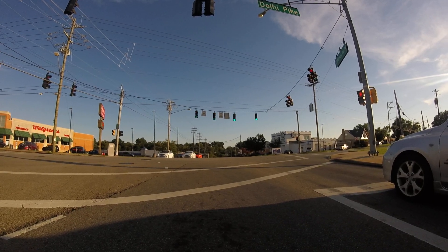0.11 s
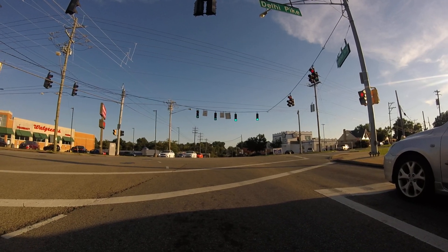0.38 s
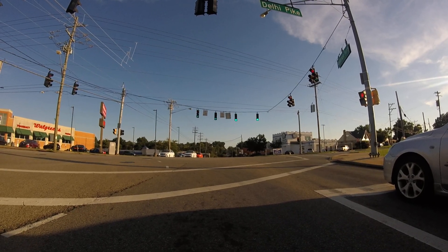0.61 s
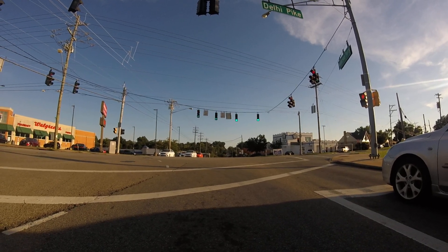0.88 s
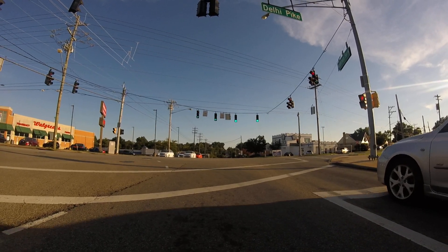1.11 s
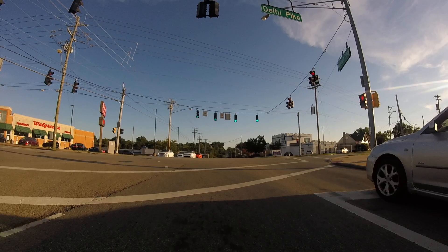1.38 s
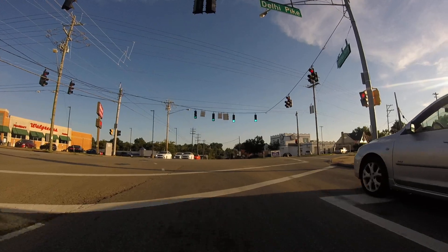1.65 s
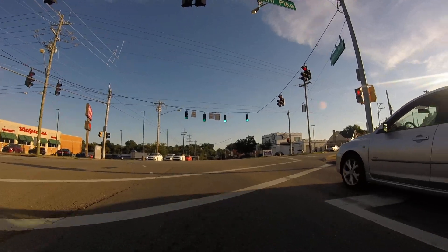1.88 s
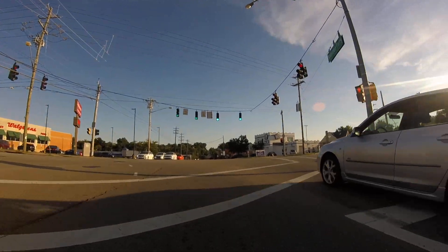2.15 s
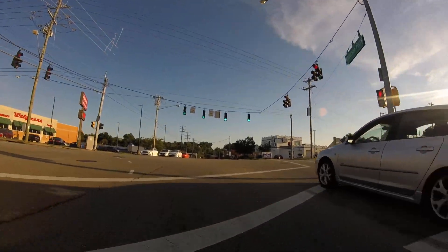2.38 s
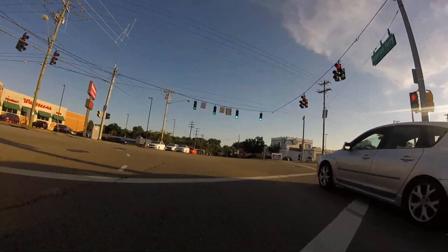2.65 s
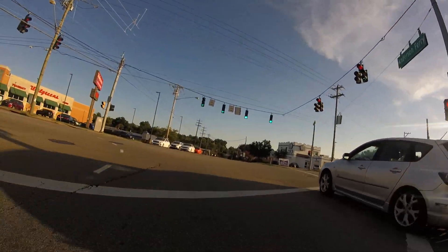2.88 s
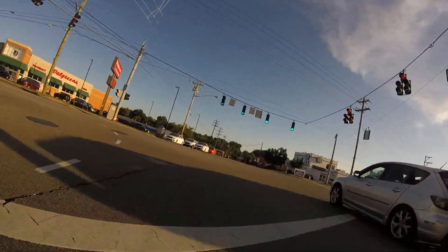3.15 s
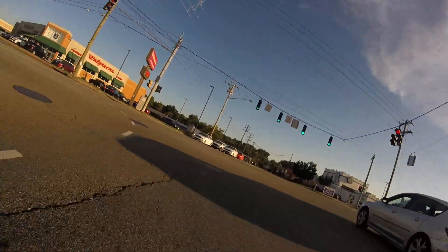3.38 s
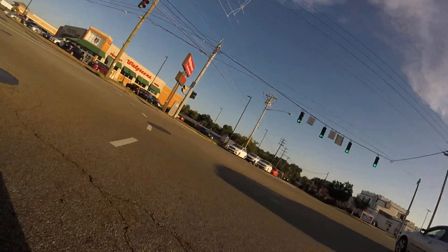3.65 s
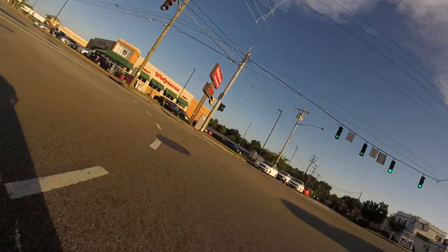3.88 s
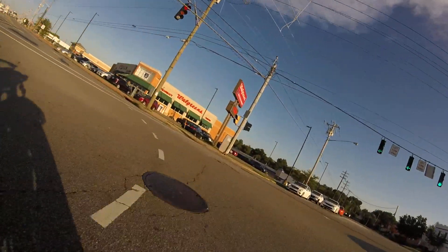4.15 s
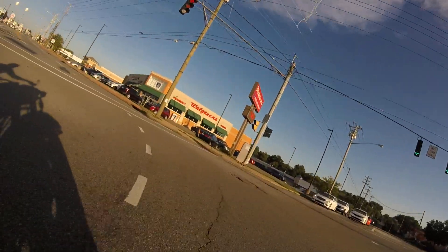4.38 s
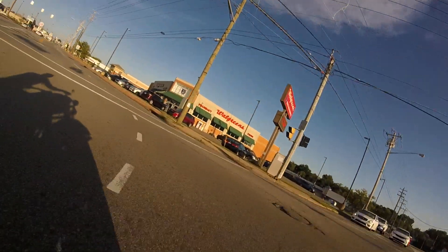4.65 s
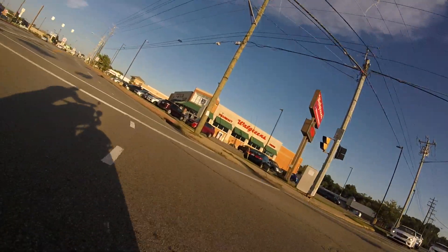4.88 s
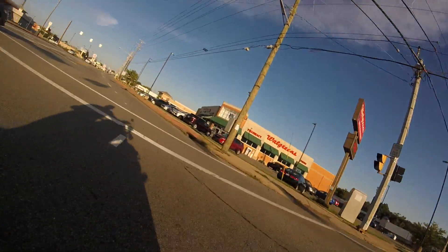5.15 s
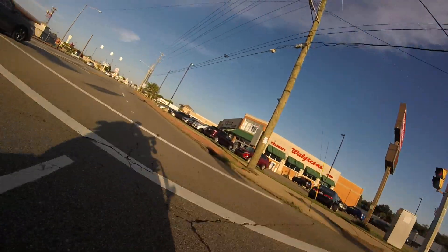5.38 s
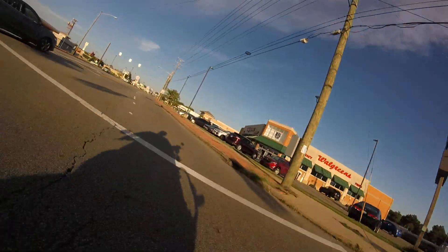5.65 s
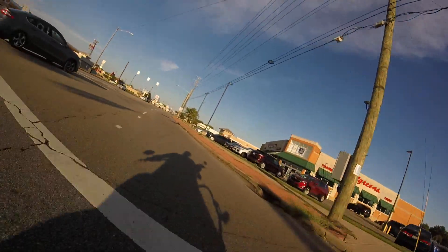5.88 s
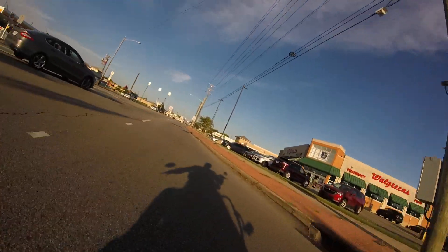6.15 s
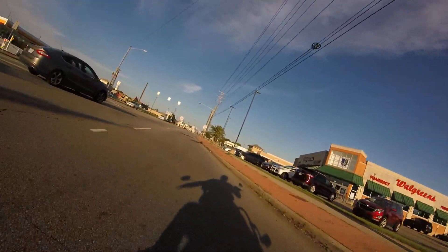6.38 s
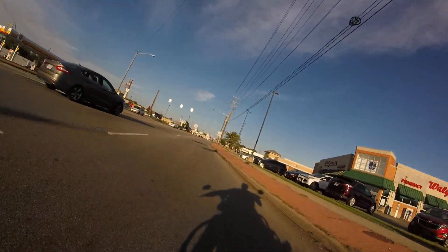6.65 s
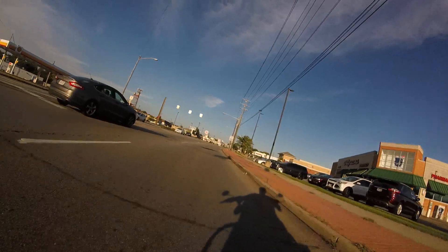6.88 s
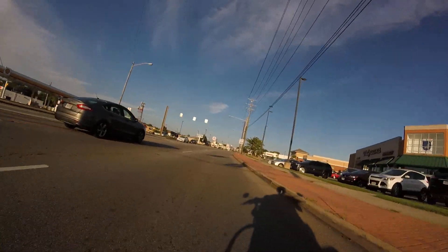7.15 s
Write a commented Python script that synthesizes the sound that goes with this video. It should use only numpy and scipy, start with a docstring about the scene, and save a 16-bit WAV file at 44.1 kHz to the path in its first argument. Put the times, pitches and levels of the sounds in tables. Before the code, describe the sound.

Muffled onboard motorcycle sound: quiet lumpy idle, sudden knock and pull-away, throbbing engine with case rattle and road-bump thuds, finally accelerating hard.

```python
"""A two-cylinder motorcycle idles, pulls away and rides on, heard by a camera in a closed case on the bike.
The crank shakes the frame; each firing thumps through it, rings the camera mount and stirs a rumble.
The camera rattles in its case in step with the crank, with loud single knocks on top; valve gear hisses and ticks.
Road bumps thud and briefly lift the hiss, rattle, rumble, pulses and shake, which then dip and creep back.
A low hum wavers at a standstill. Crank angles time the clicks that drive noise and resonances."""
import sys
import numpy as np
from scipy import signal
from scipy.io import wavfile
from scipy.ndimage import uniform_filter1d

SR = 44100
rng = np.random.default_rng(int(sys.argv[2]) if len(sys.argv) > 2 else 0)


def dump_mix(stems):
    """Bounce the given channels to the path in sys.argv[1] as a 16-bit WAV at rate SR."""
    frames = np.atleast_2d(stems).T  # one column per channel
    limited = np.clip(frames, -1, 1)  # hard clip at full scale
    pcm = np.round(limited * 32767).astype(np.int16)
    wavfile.write(sys.argv[1], SR, pcm)


def boost(x):
    """Linear amplitude factor 10**(x/20) for a level x in decibels (scalar or array-like)."""
    u = np.asarray(x, float) / 20
    return 10 ** u


N = 320607


def evened(x, span=1.0):
    """Brings the running rms over span seconds to 1."""
    power = np.abs(uniform_filter1d(x ** 2, int(span * SR)))
    return x / np.sqrt(power + 1e-14)


def curves(rows):
    """Every column of a table after its times, interpolated sample by sample."""
    s, *columns = np.transpose(rows)
    return [np.interp(np.arange(N) / SR, s, c) for c in columns]


def colour(x, points):
    """Causal filter with the given gain curve (f/Hz, level/dB)."""
    hz, db = np.transpose(points)
    size = 2 ** 14
    bins = abs(np.fft.fftfreq(size, 1 / SR))
    log_gain = np.interp(np.log(bins + 1), np.log(hz + 1), db) * np.log(10) / 20
    # the Hilbert transform of the log gain supplies the phase that makes it causal
    response = np.exp(np.conj(signal.hilbert(log_gain)))
    taps = np.fft.ifft(response).real[:size // 2]
    return signal.oaconvolve(x, taps)[:N]


def ring(x, hz, width):
    """A damped resonance, about gain 1 at its peak."""
    r = np.exp(-np.pi * width / SR)
    pole = r * np.exp(2j * np.pi * hz / SR)
    return 2 * signal.lfilter([1 - r], [1, -pole], x).real


def modes(x, table):
    """A bank of resonances; neighbouring modes answer in opposite phase."""
    return sum((-1) ** k * boost(db) * ring(x, hz, width) for k, (hz, width, db) in enumerate(table))


def fade(x, ms):
    """Turns clicks into envelopes that die away with time constant ms."""
    return signal.lfilter([1], [1, -np.exp(-1000 / (ms * SR))], x)


def beats(turns, angles, spread_db, jitter):
    """One click at each crank angle of each two-turn cycle, uneven in size (dB) and place (turns)."""
    at, db = np.transpose(angles)
    cycles = np.arange(0, turns[-1], 2)[:, None]
    chance = rng.standard_normal((len(cycles), len(at), 2))
    place = np.searchsorted(turns, cycles + at + jitter * chance[..., 0])
    size = boost(db + spread_db * chance[..., 1])
    return np.bincount(place.ravel(), size.ravel(), N + 1)[:N]


def loaded(speed, span):
    """Blend from idle (0) to riding (1) over span crank turns/s above 14."""
    return np.clip((speed - 14) / span, 0, 1)


# faint microphone noise [f/Hz, level/dB as filter gain]
HISS_FLOOR = [(3000, -78), (9000, -77), (12500, -79), (14000, -88), (16000, -105)]


def mic_hiss():
    """The microphone's own noise: white noise, nearly flat, rolled off in the highest treble."""
    return colour(rng.standard_normal(N), HISS_FLOOR)


# low hum that sinks and wavers, and the mount ring's idle swells
# [t/s, hum f/Hz, hum level/dB, mount ring level/dB]
IDLE_HUM = [(0.0, 43.55, -20, -45), (0.176, 43.56, -20.5, -28.5), (0.22, 43.24, -41, -43),
            (0.346, 44.7, -19, -31), (0.55, 42.46, -23, -35.5), (0.78, 39.5, -15.5, -23),
            (0.92, 41.5, -16.5, -35), (1.06, 40, -26.5, -30), (1.19, 38.5, -10, -24), (1.3, 40.6, -16, -32)]


def hum(speed):
    """A near-pure low tone, gone once the engine revs."""
    hz, db, _ = curves(IDLE_HUM)
    standstill = np.clip((27 - speed) / 8, 0, 1)
    return standstill * boost(db) * np.sin(2 * np.pi * np.cumsum(hz) / SR)


# road bumps under the wheels [t/s, thud drive level/dB, thud f/Hz, dip after it level/dB]
ROAD_BUMPS = [(1.342, -16, 71.3, 4.5), (2.348, -20, 75, 1.5), (3.279, -8.5, 93.8, 3),
              (4.024, -6.5, 75, 6.5), (4.627, -8.5, 75.7, 3.5), (4.68, -7, 79.6, 8), (4.774, -5, 71.2, 9),
              (4.859, -28, 75, 10), (5.076, -12.5, 73, 8.5), (5.778, -7, 81.3, 11.5), (6.235, -10, 77, 7)]


def bumps():
    """The suspension thuds for a few cycles: a sine with a quick onset and a short decay."""
    out, t = np.zeros(N), np.arange(SR // 5) / SR
    for s, db, hz, _ in ROAD_BUMPS:
        envelope = np.exp(-t / 0.042) * (1 - np.exp(-t / 0.0011))
        out[round(s * SR):][:len(t)] += boost(db) * np.sin(2 * np.pi * hz * t) * envelope
    return out


def jolts():
    """How strongly a bump jolts the hiss, rattle and engine layers (0-1), and the dip that follows (dB)."""
    lead_s, jolt_s, recover_db_per_s = 0.018, 0.065, 15
    s, db, _, dip_db = np.transpose(ROAD_BUMPS)[..., None]
    # one value per 64 samples, counted from just before the thud
    since = np.arange(0, N + 64, 64) / SR - s + lead_s
    strength = np.clip((db + 27) / 15, 0, 1)  # full from -12 dB up, none below -27 dB
    jolt = (((since > 0) & (since < jolt_s)) * strength).max(axis=0)
    remaining_db = np.maximum(dip_db - recover_db_per_s * (since - jolt_s), 0)
    dip = ((since >= jolt_s) * remaining_db).max(axis=0)
    return [uniform_filter1d(np.repeat(v, 64)[:N], size=600) for v in (jolt, dip)]


# how hard each firing pulls while riding, before each layer's share [t/s, level/dB]
PULL = [(1.2, -13.5), (1.45, -3), (1.75, 2.5), (2.2, 2.5), (3.0, -1), (3.5, -4.5), (3.75, -2),
        (3.95, -11.5), (4.45, -10.5), (5.0, 4), (5.7, -6), (6.2, 5.5), (6.7, -7.5), (7.27, -15.5)]
CRUISE, FAST = 36, 39.6  # crank turns/s: where riding levels hold, and where the fast slope begins


def level(speed, law):
    """A layer's gain from speed, throttle and bumps.

    slope: dB per doubling of speed; fast: dB per 12 turns/s above FAST; pull, dip: shares of throttle and dip.
    """
    idle_db, ride_db, slope_db, fast_db, pull, jolt_db, dips = law
    jolt, dip_db = jolts()
    ride_db = ride_db + slope_db * np.log2(speed / CRUISE)
    ride_db += fast_db * np.maximum(speed - FAST, 0) / 12
    ride_db += pull * curves(PULL)[0] + jolt_db * jolt - dips * dip_db
    return boost(idle_db + loaded(speed, 8) * (ride_db - idle_db))


# valve openings in a two-turn cycle [crank angle/turns, relative level/dB]
VALVE_ANGLES = [(.38, -5), (.95, -1.5), (1.51, -2.5), (1.84, 0.1)]
# treble colour of valve hiss and knock cracks [f/Hz, relative level/dB]
TREBLE_COLOUR = [(3000, -6), (3900, -3), (4300, -8.5), (4800, -13), (5700, -9.5), (6350, -9.5),
                 (6900, -16.5), (7400, -16.5), (8500, -20), (9600, -21), (10600, -27), (12000, -32),
                 (13200, -35), (14600, -45.5), (16000, -52)]
# hiss level law [idle/dB, ride/dB, slope/dB, fast/dB, pull, jolt/dB, dip]
HISS_LEVEL = (-63, -53.3, -4, 12.5, .1, 7, 1.35)


def valve_hiss(speed, turns):
    """Hiss that puffs as valves open, with one longer puff a cycle at idle."""
    idle = np.clip((20 - speed) / 6, 0, 1)
    openings = beats(turns, VALVE_ANGLES, spread_db=2.5, jitter=.03)
    puffs = (1 - idle) * fade(fade(openings, ms=.8), ms=3) / 36
    long_puffs = beats(turns, [(.93, 0.0097)], spread_db=5.0, jitter=0.0088)
    puffs += idle * 0.95 * fade(long_puffs, ms=6.5)
    hiss = colour(rng.standard_normal(N) * (.38 + puffs), TREBLE_COLOUR)
    return level(speed, HISS_LEVEL) * evened(hiss, span=.3)


# bright metal resonances, passed through twice [f/Hz, width/Hz, relative level/dB per pass]
TICK_MODES = [(7910, 400, 0), (9100, 380, 2), (10500, 400, -4), (12000, 340, -2.5)]
# how the tick comes and goes [t/s, level/dB before dips and resonance]
TICK_LEVEL = [(0, -80), (3.55, -60), (3.8, -50), (4.2, -44), (5.75, -44), (5.9, -58), (7.27, -62)]


def valve_tick(turns):
    """Valve gear ticks once a cycle: a click and a noise burst ring bright modes."""
    ticks = beats(turns, [(1.4, 0)], spread_db=1.5, jitter=.01)
    contact = 8 * ticks + rng.standard_normal(N) * fade(ticks, ms=1.5)
    tick = modes(modes(contact, TICK_MODES), TICK_MODES)
    return boost(curves(TICK_LEVEL)[0] - 0.29 * jolts()[1]) * tick


def strike(hits, noise):
    """A firm first contact and a short scrape."""
    return uniform_filter1d(8 * hits, size=5) + .75 * noise * fade(hits, ms=1.8)


# what the camera case rings with [f/Hz, width/Hz, relative level/dB]
CASE_MODES = [(764, 58, -7.5), (1071, 85.5, 3.5), (1332, 134, 2), (2050, 127, -3.5), (2485, 161, -2),
              (3200, 460, -17.5), (3690, 59, -19.5), (4540, 250, -32)]


def case(drive):
    """The case rings, and its walls dull the treble."""
    return signal.lfilter(*signal.butter(2, 4600, fs=SR), modes(drive, CASE_MODES))


# loud single knocks of the camera in its case
# [t/s, relative level/dB, treble against that level/dB]
SINGLE_KNOCKS = [(0.176, -26, -38), (0.2533, -17, -52), (0.3296, -22, -44), (0.4844, -26, -40),
                 (0.6489, -30, -36), (1.2136, -19, -34), (1.2444, -5, -31), (1.2501, 2, -38),
                 (1.3473, -6, -31), (1.3738, -12, -35), (1.3844, -10, -35), (1.4167, -10, -36),
                 (1.948, -12, -41), (2.1011, -13, -36), (2.2892, -14, -40), (2.3565, -10, -32),
                 (2.4608, -13, -38), (2.5351, -14, -37), (2.6823, -14, -41), (2.9741, -11, -43),
                 (3.2151, -8, -44), (3.2869, -12, -44), (3.5428, -10, -38), (3.7354, -9, -42),
                 (3.7953, -8, -47), (4.0377, -9, -35), (4.2542, -10, -44), (4.2837, -7, -54),
                 (4.5845, -10, -40), (4.6349, -7, -30), (4.6414, -9, -28), (4.6997, -9, -27),
                 (4.7721, -13, -33), (4.8873, -15, -33), (5.0769, -16, -36), (5.3477, -13, -44),
                 (5.5393, -11, -43), (5.7823, -10, -25), (5.8202, -14, -32), (6.2133, -12, -31),
                 (6.2572, -14, -28), (7.015, -6, -35)]


def knocks():
    """Each knock rings the case, with a crack on top; in the first second the camera also settles loosely."""
    s, db, treble_db = np.transpose(SINGLE_KNOCKS)
    at = (s * SR).astype(int)
    body = np.bincount(at, boost(db), N)
    crack = np.bincount(at, boost(db + treble_db), N)
    noise = rng.standard_normal((3, N))
    early = np.arange(N) < SR
    settle = noise[2] * fade(body * early, ms=28)
    loose = case(settle)
    loose += boost(15.5) * ring(ring(settle, 296, 120), 290, 250)
    loose += boost(3) * ring(ring(settle, 775, 80), 680, 200)
    firm = boost(10.0) * case(strike(body * np.where(early, .6, 1), noise[0]))
    return firm + loose + boost(20.5) * colour(noise[1] * fade(crack, ms=2.4), TREBLE_COLOUR)


# shake reversals in a two-turn cycle [crank angle/turns, relative level/dB]
REVERSAL_ANGLES = [(.17, -2.5), (.68, -3), (1.23, 0), (1.75, -3)]
# the idling engine heard through the case [f/Hz, relative level/dB]
IDLE_WHIRR = [(350, -31), (600, -4), (799, 0.5), (922, -12), (1010, 7), (1230, -6.5), (1380, 9),
              (1510, -17.5), (1660, -9), (2090, 4.5), (2830, -4), (3320, -15.5), (3620, -12), (4020, -37),
              (5230, -40.5), (8840, -120)]
# rattle level law [idle/dB, ride/dB, slope/dB, fast/dB, pull, jolt/dB, dip]
RATTLE_LEVEL = (-46, -25, 7.5, -2, 0, 1.5, 0.61)


def rattle(speed, turns):
    """The camera strikes its case as the shake reverses; stray bounces and chatter grow; idle only whirrs."""
    riding = loaded(speed, 8)
    stray = rng.random(N) < 3 * (speed - 16) / SR  # 3 a second for each turn/s above 16
    bounces = stray * boost(-10 + 3 * rng.standard_normal(N))
    hits = beats(turns, REVERSAL_ANGLES, spread_db=1.4, jitter=.013)
    noise = rng.standard_normal((3, N))
    chatter = (.13 + .012 * np.maximum(speed - 38, 0)) * noise[0]
    buzz = evened(case(strike(hits + bounces, noise[1]) + chatter), span=.3)
    whirr = evened(colour(noise[2], IDLE_WHIRR))
    return level(speed, RATTLE_LEVEL) * (riding * buzz + (1 - riding) * whirr)


# crank multiples that excite the mount [multiple of crank rate, ring level/dB before dips]
RING_ORDERS = [(2, -17), (2.5, -27), (3, -11.5), (3.5, -17), (4, -16.5), (4.5, -22)]


def mount_level(speed):
    """Near a crank order the ring is strong, between orders it fades."""
    mount_hz, reach_hz, off_db, dip_share = 114.5, 6.1, -33.5, 1.17
    near = sum(boost(db) ** 2 / (1 + ((mount_hz - k * speed) / reach_hz) ** 4) for k, db in RING_ORDERS)
    ride_db = 10 * np.log10(boost(off_db) ** 2 + near) - dip_share * jolts()[1]
    idle_db = curves(IDLE_HUM)[2]
    return boost(idle_db + loaded(speed, 12) * (ride_db - idle_db))


def mount_ring(speed, fired):
    """Firings and noise excite the camera mount's narrow resonance at 113 Hz."""
    drive = evened(fired) + .4 * rng.standard_normal(N)
    return mount_level(speed) * evened(ring(ring(drive, 113, 12), 113, 24), span=.15)


# frame spectrum at idle [f/Hz, relative level/dB]
IDLE_FRAME = [(79, -35), (135, -2), (151, -29), (204, -8), (236, -6.5), (317, 1.5), (393, -19), (463, -10),
              (500, -23), (565, -19), (700, -54.5), (910, -59.5), (1540, -120)]
# frame spectrum under load [f/Hz, relative level/dB]
LOADED_FRAME = [(79, -35), (135, -6), (156, -4.5), (226, -1), (280, -2), (324, -7.5), (404, -15.5),
                (500, -24.5), (700, -28), (910, -59.5), (1540, -120)]
# rumble level law [idle/dB, ride/dB, slope/dB, fast/dB, pull, jolt/dB, dip]
RUMBLE_LEVEL = (-35, -17.5, 7.5, -3, 0.1159, 3.5, 0.75)


def frame_rumble(speed, fired):
    """Noise coloured by the frame; under load it swells and thumps with each firing."""
    riding, noise = loaded(speed, 12), rng.standard_normal(N)
    drive = .5 * evened(fired) + evened(noise * (0.75 + fade(fired, ms=73)))
    idle_rumble = evened(colour(noise, IDLE_FRAME))
    loaded_rumble = evened(colour(drive, LOADED_FRAME))
    return level(speed, RUMBLE_LEVEL) * ((1 - riding) * idle_rumble + riding * loaded_rumble)


# firing pulse level law [idle/dB, ride/dB, slope/dB, fast/dB, pull, jolt/dB, dip]
PULSE_LEVEL = (-58, -18, 2, -2.5, 1, 5.5, 1.26)


def firing_pulses(speed, fired):
    """Each firing pulls the diaphragm back for a few milliseconds."""
    push = .3 * rng.standard_normal(N) - evened(fired)
    kick = signal.oaconvolve(push, signal.windows.gaussian(801, 75), "same")
    pulses = signal.filtfilt(*signal.butter(2, 48, "high", fs=SR), kick)
    return level(speed, PULSE_LEVEL) * evened(pulses)


# crank shake level law [idle/dB, ride/dB, slope/dB, fast/dB, pull, jolt/dB, dip]
SHAKE_LEVEL = (-28, -16, 6.5, 0.4, 0.5, 2.5, 1.5)


def crank_shake(speed, turns, fired):
    """Unbalance shakes once a turn under load; at idle the firings only rock the bike on its springs."""
    riding = loaded(speed, 12)
    drive = evened(fired) + .5 * rng.standard_normal(N)
    rocking = evened(ring(ring(drive, 32.8, 22), 28, 35))
    unbalance = np.sqrt(2) * np.cos(2 * np.pi * (turns - .06))
    return level(speed, SHAKE_LEVEL) * (riding * unbalance + (.6 - .4 * riding) * rocking)


# the two cylinders' firings in a two-turn cycle [crank angle/turns, relative level/dB]
FIRING_ANGLES = [(0.594, 0.5), (1.64, 4.1)]


def engine(speed, turns):
    """Crank shake, firing pulses, mount ring and rumble share one train of firings."""
    fired = beats(turns, FIRING_ANGLES, spread_db=1.5, jitter=.005)
    return (crank_shake(speed, turns, fired) + firing_pulses(speed, fired)
            + mount_ring(speed, fired) + frame_rumble(speed, fired))


# engine speed from idle through the ride [t/s, crank turns per s]
CRANK_SPEED = [(0.0, 12.75), (1.17, 12.6), (1.3, 27.12), (1.4, 29.79), (1.8, 25.84), (2.2, 26.21),
               (2.8, 27.53), (3.2, 26.99), (3.6, 31.3), (4.2, 36.11), (5.0, 36.46), (5.2, 35.83),
               (5.4, 36.17), (5.6, 37.7), (5.8, 39.69), (6.8, 53.57), (7.27, 59.65)]


def scene():
    """One crank times the engine, rattle and valves; hum, bumps and knocks join them."""
    speed, = curves(CRANK_SPEED)
    turns = np.cumsum(speed) / SR
    background = hum(speed) + bumps() + valve_hiss(speed, turns) + valve_tick(turns)
    return (background + knocks() + rattle(speed, turns) + engine(speed, turns))[None]


def top_cut(x):
    """Nothing passes above the cut-off."""
    return signal.sosfilt(signal.butter(12, 15700, fs=SR, output="sos"), x)


def record(dry):
    """The microphone adds a faint hiss; the preamplifier rounds off the highest peaks."""
    noisy = dry + mic_hiss()
    return top_cut(1.3 * np.tanh(noisy / 1.2))


dry = scene()
out = record(dry)
dump_mix(out)
```